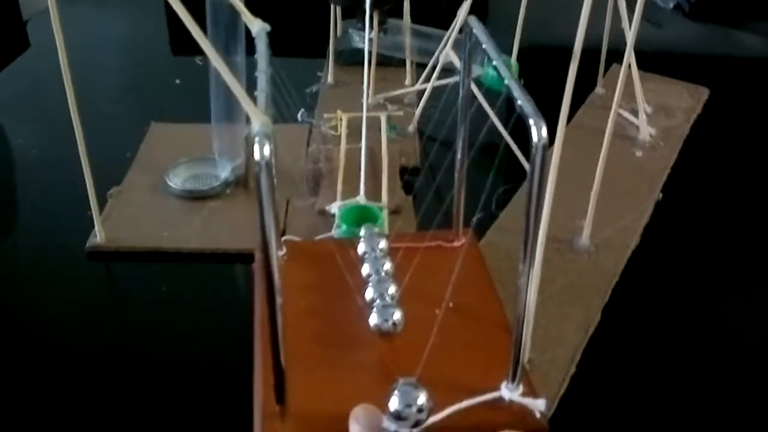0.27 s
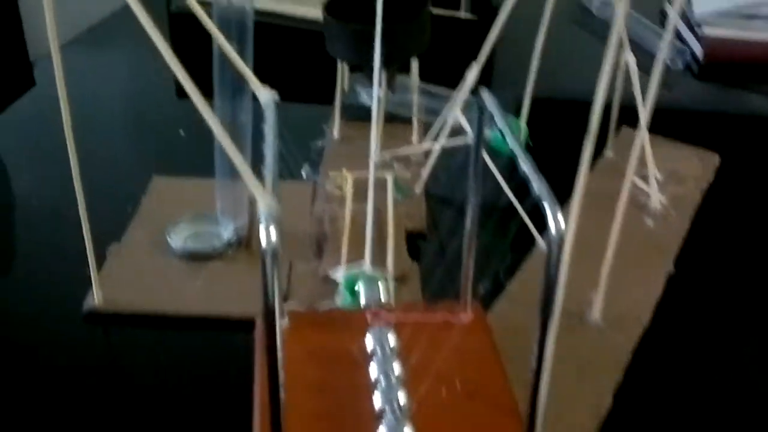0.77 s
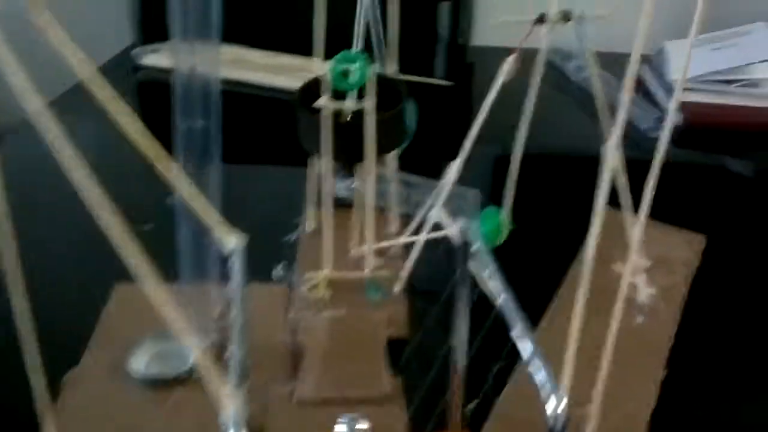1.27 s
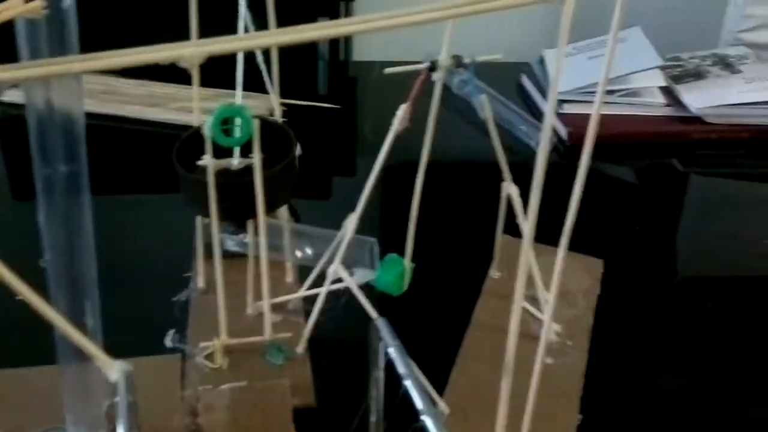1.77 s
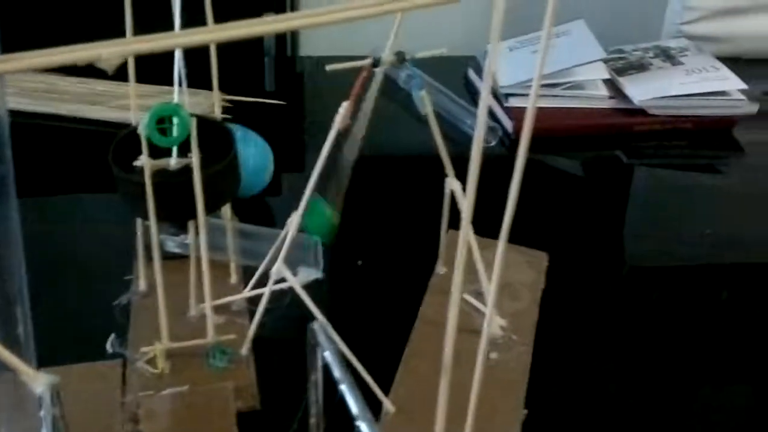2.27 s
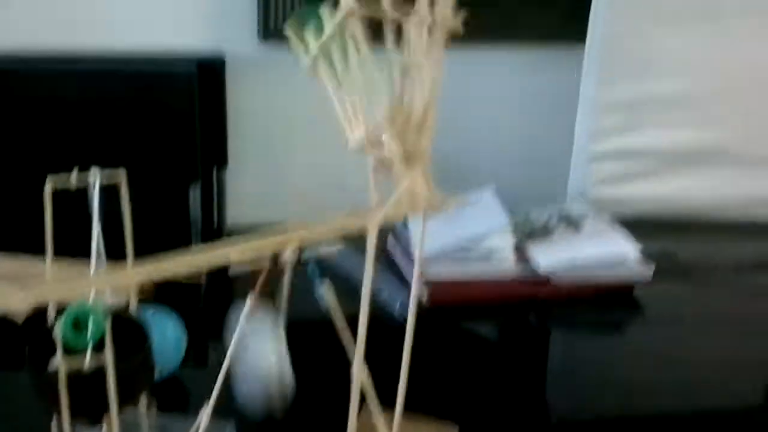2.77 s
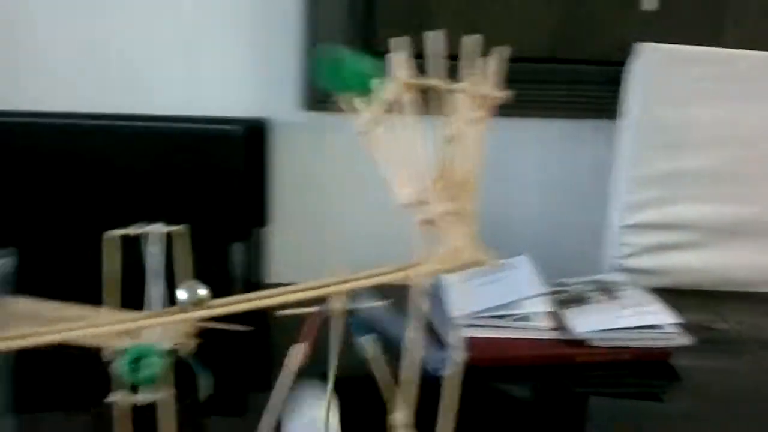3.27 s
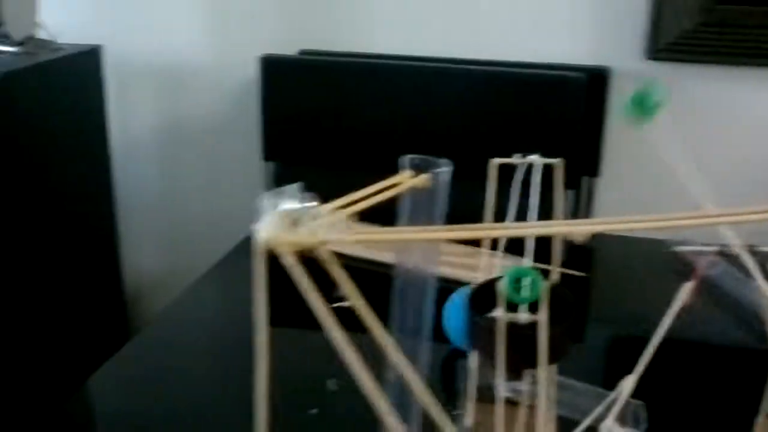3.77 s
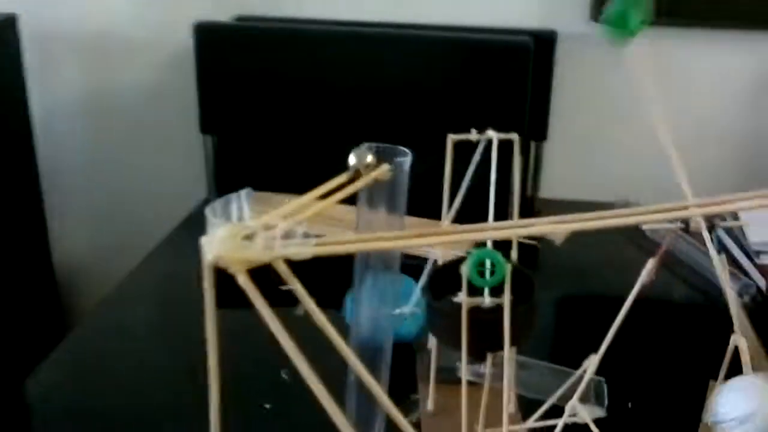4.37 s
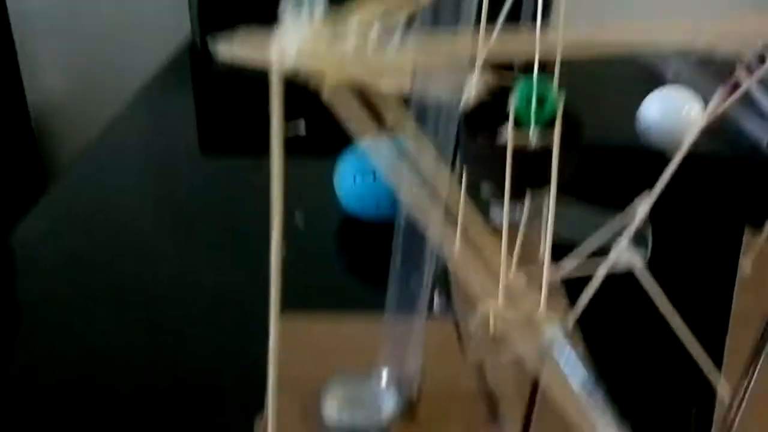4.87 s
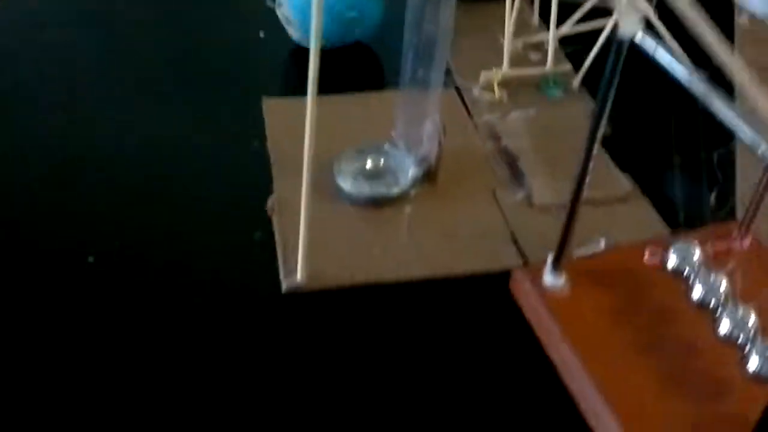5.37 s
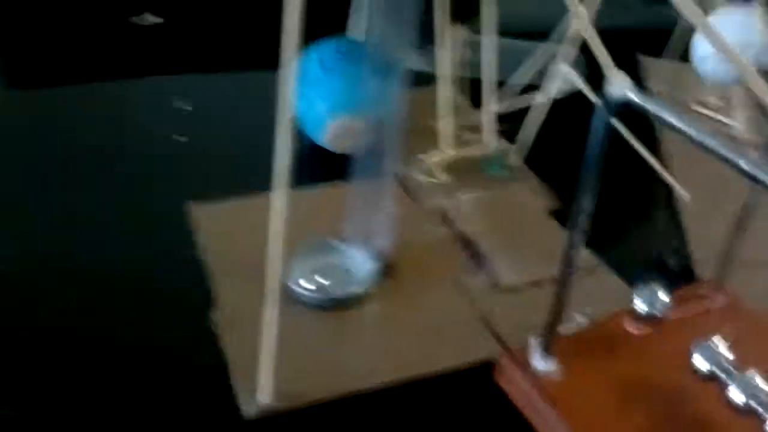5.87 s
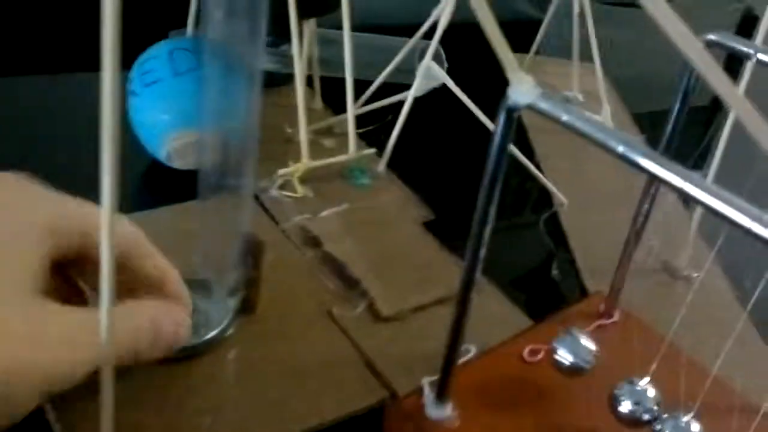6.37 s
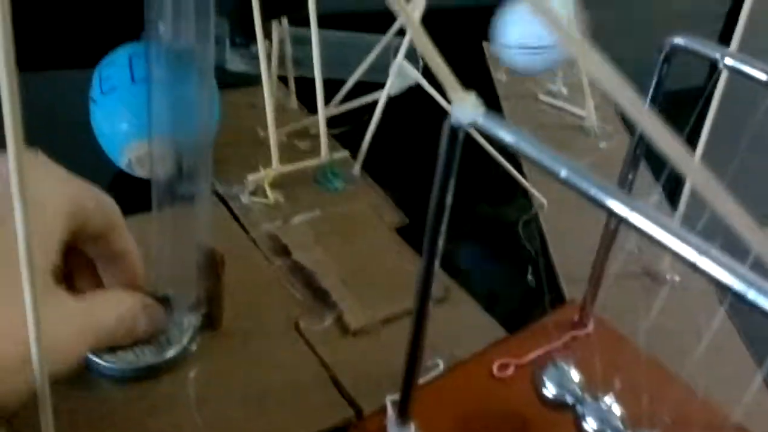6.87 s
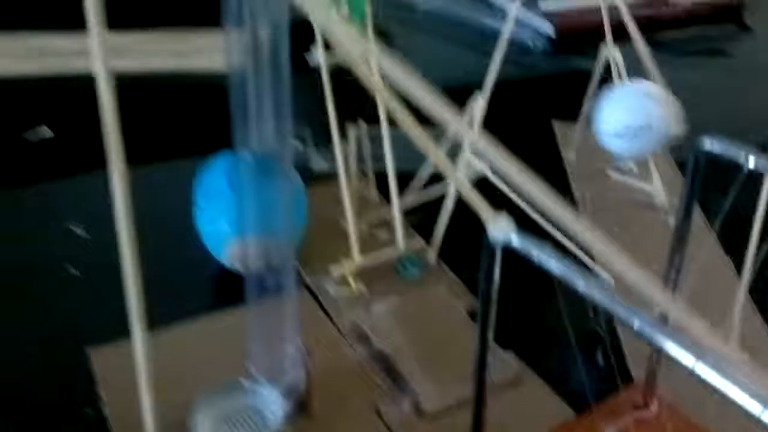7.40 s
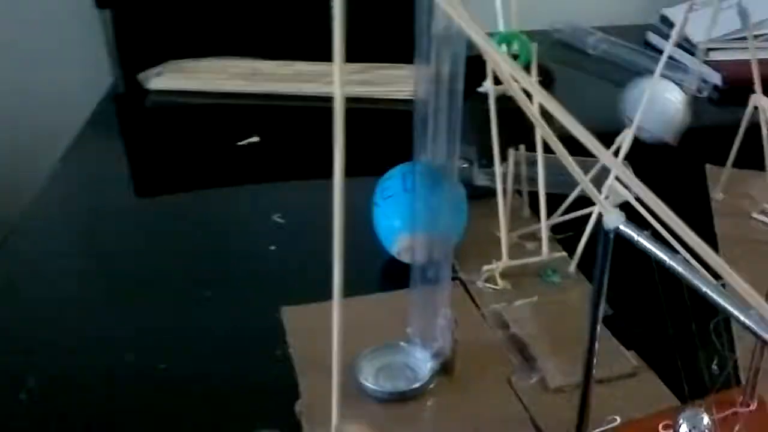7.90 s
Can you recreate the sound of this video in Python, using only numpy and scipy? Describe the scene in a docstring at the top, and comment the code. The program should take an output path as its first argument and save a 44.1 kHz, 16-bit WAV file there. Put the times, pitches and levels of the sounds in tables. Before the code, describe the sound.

Close handheld microphone in a small room with soft low drone. Steel balls begin clicking, a catch snaps, then a weight falls with loud sharp cracks and hollow booming thuds. Stick levers clack and knock, a ball rolls faintly down rails, hits a tube rim, rattles down and lands in a metal lid. Cradle clicks continue about three per second, with small finger clinks near the end.

```python
"""On a table in a small room a homemade chain-reaction machine runs, close to a hand-held camera.
A cradle of steel balls clicks three times a second and trips a catch; a weight drops, levers of sticks knock,
and a steel ball rolls down rails, falls through a plastic tube into a metal lid and is picked out by hand.
Blows excite ringing modes and a dense, quickly dying rattle; rolling and rubbing are streams of tiny random
contacts. Room noise with a low drone lies beneath, and dense reflections surround every blow."""
import sys
import numpy as np
from scipy import signal
from scipy.fft import rfft, irfft
from scipy.io import wavfile
from scipy.ndimage import uniform_filter1d

SR = 44100
rng = np.random.default_rng(int(sys.argv[2]) if len(sys.argv) > 2 else 0)


def digitize_waveform(pressure):
    """Quantize a signal to 16-bit integers and store it at the path in sys.argv[1].

    Rows of a 2-D input are taken as channels; values are limited to [-1, 1].
    """
    field = np.atleast_2d(pressure).T
    bounded = np.clip(field, -1, 1)
    quanta = np.round(bounded * 32767).astype(np.int16)
    wavfile.write(sys.argv[1], SR, quanta)


N = 358929
SIZE = 32768  # samples in the response of one blow
HZ = np.fft.rfftfreq(SIZE, 1 / SR)
T = np.arange(SIZE) / SR
TIME = np.arange(N) / SR


def amp(db):
    """Decibels to gain."""
    return 10 ** (np.asarray(db) / 20)


def read(points, hz):
    """A table joined by straight lines on a log-frequency axis."""
    f, value = np.transpose(points)
    return np.interp(np.log(hz + 1), np.log(f + 1), value)


def evened(x):
    """Scaled to rms 1."""
    return x / np.sqrt(np.mean(abs(x) ** 2) + 1e-20)


def panned(pan_db):
    """Left and right gains; a positive value makes the left louder by that much."""
    return amp([[pan_db / 2], [-pan_db / 2]])


def add(mix, s, sound):
    """Adds a stereo sound at time s."""
    part = mix[:, max(round(s * SR), 0):][:, :sound.shape[1]]
    part += sound[:, :part.shape[1]]


def causal(db):
    """Complex log response of the causal (minimum-phase) filter with this dB curve."""
    cepstrum = irfft(db * np.log(10) / 20)
    cepstrum[1:SIZE // 2] *= 2
    cepstrum[SIZE // 2 + 1:] = 0
    return rfft(cepstrum)


def body(colour, modes):
    """Response of an object: a broad colour with ringing modes added to it."""
    rings = 0
    for hz, db, t60 in modes:
        rings = rings + amp(db) / (1 + 2j * np.pi * (HZ - hz) * t60 / np.log(1000))
    return np.exp(causal(read(colour, HZ))) * (1 + rings)


def diffuse(z, hz):
    """Two unrelated spectra become a microphone pair: alike in the bass, nearly unrelated in the treble."""
    # left-right likeness of diffuse sound [f/Hz, correlation 0-1]
    likeness = [(25, 0.025), (70, 1), (250, 0.93), (500, 0.88), (1000, 0.62), (2000, 0), (16000, 0.097)]
    same = read(likeness, hz)
    mid = np.sqrt((1 + same) / 2) * z[0]
    side = np.sqrt((1 - same) / 2) * z[1]
    return np.array([mid + side, mid - side])


def room(build_s=0.0037, early_db=2, early_s=0.012):
    """One random response of the room: dense reflections, each band dying at its own speed."""
    # reverberation time by band [f/Hz, t60/s]
    decay = [(80, 0.55), (250, 0.39), (1000, 0.38), (2500, 0.34), (5000, 0.29), (9000, 0.24), (16000, 0.17)]
    # spectral balance of the reflections [f/Hz, level/dB]
    balance = [(60, 0.5), (250, -2.5), (1000, -2.5), (3000, -6), (7000, -6.5), (12000, -5), (16000, -13.5)]
    taps = rng.standard_normal((2, SIZE)) * (rng.random((2, SIZE)) < .15)
    hz, t, z = signal.stft(taps, SR, nperseg=256)
    dying = amp(-60 * t / read(decay, hz)[:, None])
    tail = signal.istft(z * dying, SR, nperseg=256)[1][:, :SIZE]
    tail *= 1 - np.exp(-(T / build_s) ** 2)  # the reflections build up
    tail *= amp(early_db * np.exp(-T / early_s))  # the early ones are stronger
    return evened(diffuse(rfft(tail), HZ)) * amp(read(balance, HZ))


def placed(rows, pan_db, room_db, tilt_db=0):
    """Blows on one object share its place and tilt: rows of (s, level, brightness, left-right, room)."""
    return [(s, db, tilt_db + sum(bright), pan_db, room_db) for s, db, *bright in rows]


def blows(rows, thing, rooms, dense_hz=500, apart=0.9, smear_s=.0008, bounce=0.18, left_lead_s=.00008):
    """Each blow is a sharp push and a quickly dying rattle of dense modes, heard through object and room."""
    colour, modes, rattle_s, share = thing
    response = body(colour, modes)
    # bending waves carry the treble faster: the delay is smear_s at 1 kHz
    response = response * np.exp(-4j * np.pi * smear_s * np.sqrt(HZ * 1000))
    slope = causal(np.log2(np.clip(HZ, 150, 12000) / 1000))  # one dB per octave, pivoting at 1 kHz
    share = share * HZ ** 2 / (HZ ** 2 + dense_hz ** 2)  # modes are sparse in the bass
    lag = np.exp(-2j * np.pi * HZ * np.array([[0], [left_lead_s]]))
    dying = np.exp(-np.log(1000) * T[:SIZE // 16] / rattle_s)
    fade = np.minimum(2 * (1 - T / T[-1]), 1) ** 2
    out = np.zeros((2, N))
    for k, (s, db, bright, pan_db, room_db) in enumerate(rows):
        common, left, right = rng.standard_normal((3, len(dying))) * dying
        rattle = evened(rfft(common + apart * np.array([left, right]), SIZE))
        hit = np.sqrt(1 - share) + np.sqrt(share) * rattle
        hit = hit * response * np.exp(bright * slope)
        # the table top throws the treble back
        hit *= 1 + bounce * share * np.exp(-2j * np.pi * HZ * rng.uniform(0.00059, .0015))
        hit = evened(hit) * np.sqrt(.002 * SR)  # unit level: energy packed into 2 ms has rms 1
        direct = evened(panned(pan_db)) * lag
        reflected = amp(room_db) * rooms[k % len(rooms)]
        add(out, s, amp(db) * fade * irfft(hit * (direct + reflected)))
    return out


def coloured(drive, thing):
    """A stereo stream played through an object, at rms 1."""
    pair = irfft(diffuse(rfft(drive), np.fft.rfftfreq(N, 1 / SR)), N)
    return evened(signal.oaconvolve(pair, irfft(body(*thing))[None], axes=1)[:, :N])


def friction(gain, thing, grains_per_s, spread_db, lumps_db, pan_db):
    """Tiny random contacts of rolling or sliding ring the object; uneven surfaces bunch them into lumps."""
    sizes = amp(spread_db * np.minimum(rng.exponential(1, (2, N)), 4)) * rng.standard_normal((2, N))
    grains = sizes * (rng.random((2, N)) < grains_per_s / SR)
    lumps = rng.standard_normal(N)
    for size in (2200, 900):
        lumps = uniform_filter1d(lumps, size=size)
    return gain * coloured(grains * amp(lumps_db * evened(lumps)), thing) * panned(pan_db)


def strokes(rows, edge_db=10):
    """Gain of short rubs: each swells to its peak and fades again, edge_db down at the ends of its length."""
    return sum(amp(db - edge_db * 2 * abs(TIME - s) / length) for s, db, length in rows)


def air():
    """Soft room noise: random noise through a broad colour, with resonances for a low drone."""
    # colour of the noise [f/Hz, relative level/dB]
    noise_colour = [(20, -9.5), (58, 2), (100, -12), (170, -8.5), (280, -5.5), (400, -13.5), (800, -14.5),
                    (1300, -14.5), (2000, -20.5), (4000, -24.5), (6300, -30), (10000, -32.5),
                    (16000, -43.5)]
    # resonances of the drone [f/Hz, level against the colour/dB, t60/s]
    drone = [(53.7, 4.5, 0.89), (184, -1, 0.56), (237.8, -8.5, 0.18), (288.6, 8, 0.25)]
    # loudness over time [t/s, level/dB]
    loudness = [(0, -57.5), (.6, -54.5), (5.6, -55), (8.14, -57)]
    gain = amp(np.interp(TIME, *np.transpose(loudness)))
    return gain * coloured(rng.standard_normal((2, N)), (noise_colour, drone))


def handling():
    """The hand shifts on the camera: grains of friction sound through its body."""
    # shifts of the grip [peak t/s, peak level/dB, length/s]
    shifts = [(5.46, -58, 0.049), (5.545, -48.5, .08), (5.76, -54, 0.21), (5.93, -48.5, 0.11),
              (6.11, -54, 0.13)]
    # gripped body: colour [f/Hz, level/dB], modes [f/Hz, level against the colour/dB, t60/s]
    gripped = ([(30, 1.5), (100, -4.5), (300, 5.5), (550, -6), (900, -14.5), (2000, -26), (5000, -23.5),
               (16000, -47.5)], [(550, 0, 0.049)])
    return friction(strokes(shifts), gripped, grains_per_s=900, spread_db=2, lumps_db=2, pan_db=2)


def camera_bumps(rooms):
    """Fingers bump the camera body: dull blows, far to the left, with little room around them."""
    # bumps [t/s, level/dB, brightness/dB per octave]
    bumps = [(5.7835, -20.5, -2.5), (5.792, -28, 1.5), (5.8055, -17, 3)]
    # camera: colour [f/Hz, level/dB], modes [f/Hz, level against colour/dB, t60/s], rattle t60/s, share 0-1
    camera = ([(25, -4.5), (160, 0), (400, 2), (750, -5.5), (1200, -14), (3000, -18), (5000, -38.5),
              (16000, -72)], [(163.5, 2.6, 0.047)], 0.032, 0.8)
    return blows(placed(bumps, pan_db=12, room_db=-21.5), camera, rooms)


def table_booms(rooms):
    """Heavy blows set the table top booming in its low modes."""
    # booms [t/s, level/dB]
    booms = [(.592, -39), (.618, -37.5), (.795, -36.5), (.866, -41.5), (1.0155, -12.5), (1.028, -9.5),
             (1.055, -15), (1.178, -20.5), (1.246, -12), (1.283, -12), (1.812, -42), (2.675, -24.5),
             (2.880, -39), (3.675, -32.5), (3.790, -33.5), (4.757, -18.5)]
    # table top: colour [f/Hz, level/dB], modes [f/Hz, level against colour/dB, t60/s], rattle t60/s, share 0-1
    table = ([(25, -24.5), (55, -12.5), (85, -5.5), (125, -4), (170, 3.5), (290, 0), (400, -17.5),
             (800, -35), (4000, -71)], [(83, 14, 0.3), (158, 11.2, 0.16), (201, 1.2, 0.46),
             (251, 1.2, 0.52), (326, 3, 0.57)], 0.015, 0.94)
    return blows(placed(booms, pan_db=1.4, room_db=-4.5, tilt_db=2.66), table, rooms)


def creaking():
    """Sticks creak faintly as the first ball is let go: sparse, uneven grains excite strong resonances."""
    # creaks [peak t/s, peak level/dB, length/s]
    creaks = [(.39, -58.5, .03), (.435, -53, 0.064)]
    # creaking sticks: colour [f/Hz, level/dB], modes [f/Hz, level against the colour/dB, t60/s]
    sticks = ([(300, -29), (1500, -18.5), (2400, -5), (4000, -7), (8000, -21), (16000, -39.5)],
              [(2390, 38, .015), (3600, 4, .04)])
    return friction(strokes(creaks), sticks, grains_per_s=1500, spread_db=5, lumps_db=4.0, pan_db=-1.0)


def scraping():
    """Light rubs of the swinging weight, then of fingers in the lid, as dense grains in lumps."""
    # rubs [peak t/s, peak level/dB, length/s]
    rubs = [(1.61, -34.5, .05), (1.81, -44, 0.077), (1.92, -53, .13), (5.83, -48, .08), (6.385, -43, .08),
            (6.56, -51.5, .2), (6.74, -53, .05), (6.8, -40, .06)]
    # rubbed surface: colour [f/Hz, level/dB], modes [f/Hz, level against the colour/dB, t60/s]
    surface = ([(100, -17), (300, 4), (700, -4), (1400, -3.5), (2200, -2), (3500, -9.5), (5500, -15),
               (9000, -25), (16000, -41.5)], [(1898, 3.4, 0.07)])
    return friction(strokes(rubs), surface, grains_per_s=2600, spread_db=1.5, lumps_db=4.5, pan_db=-2.0)


def stand_taps(rooms):
    """Light taps ring the stand of the weight."""
    # taps [t/s, level/dB]
    taps = [(.559, -39.5), (.642, -37.5), (.672, -40.5), (1.6133, -19.5), (1.6192, -16), (1.636, -16),
            (1.845, -32), (2.233, -34.5), (2.249, -26.5)]
    # stand: colour [f/Hz, level/dB], modes [f/Hz, level against colour/dB, t60/s], rattle t60/s, share 0-1
    stand = ([(50, -49), (160, -7), (400, -7.5), (700, -10.5), (1150, -5.5), (1600, -1), (2200, -5),
             (3500, -2.5), (5500, -10.5), (8000, -19), (16000, -45)], [(1580, 3.3, 0.05), (1184, 1.5, .06)],
             0.027, 0.66)
    return blows(placed(taps, pan_db=-1.0, room_db=-0.15, tilt_db=0.5), stand, rooms)


def catch_release(rooms):
    """The catch lets go in two close clicks with ringing modes."""
    # clicks [t/s, level/dB]
    clicks = [(.792, -18), (.807, -19)]
    # catch: colour [f/Hz, level/dB], modes [f/Hz, level against colour/dB, t60/s], rattle t60/s, share 0-1
    catch = ([(100, -24.5), (700, -21.5), (1200, -13), (1600, -5), (2400, 0.5), (3400, -4), (4800, -3.5),
             (6500, -16), (10000, -33.5), (16000, -43)], [(860, 13.5, .12), (2450, 0.5, 0.045)], 0.0037, .7)
    return blows(placed(clicks, pan_db=-1.8, room_db=4.2), catch, rooms)


def frame_snaps(rooms):
    """The falling weight snaps against its frame, which rings."""
    # snaps [t/s, level/dB, brightness/dB per octave]
    snaps = [(.989, -26, 2), (1.0148, -4.5, 1.47), (1.020, -11, 0.8), (1.127, -17, 2), (1.137, -22, 3),
             (1.1773, -5.5, -0.2), (1.181, -8.5, 2.5), (1.235, -25, 1), (1.250, -23.5, -1.5),
             (1.283, -31, -2.5)]
    # frame: colour [f/Hz, level/dB], modes [f/Hz, level against colour/dB, t60/s], rattle t60/s, share 0-1
    frame = ([(80, -23.5), (250, -17), (500, -3), (1000, -1.5), (1600, -4), (2500, -10), (4500, -0.5),
             (6000, -8.5), (9000, -16.5), (12000, -32), (16000, -52)], [(828, 6.5, 0.21), (1150, 0.5, 0.12),
             (1268, 5.5, 0.053), (2500, 1.5, 0.012), (4300, -6.5, 0.058)], 0.016, 0.63)
    return blows(placed(snaps, pan_db=1.0, room_db=1.6), frame, rooms)


def weight_thuds(rooms, count=6):
    """The weight lands twice with hollow thuds and rocks from edge to edge, weaker each time."""
    # landings [t/s, level/dB, time between rocks/s, loss per rock/dB]
    landings = [(1.2455, -7, .0044, 3), (1.2823, -8, .0105, 3.5)]
    # weight: colour [f/Hz, level/dB], modes [f/Hz, level against colour/dB, t60/s], rattle t60/s, share 0-1
    weight = ([(60, -15), (150, -8.5), (280, 2), (420, 1), (650, 4), (900, -1), (1300, 3), (1700, -17.5),
              (2500, -17), (4500, -29.5), (8000, -60.5), (16000, -69)], [(273, 6, 0.4), (486, 8.5, 0.34),
              (589, 1.5, 0.25), (786, 2.5, 0.25), (1200, 0, 0.14), (1230, 2.5, 0.25), (1374, -0.5, 0.3)],
              .016, 0.39)
    rocks = [(s + k * gap_s, db - k * loss_db)
             for s, db, gap_s, loss_db in landings for k in range(count)]
    return blows(placed(rocks, pan_db=1.0, room_db=1.55), weight, rooms)


def lever_clacks(rooms):
    """Light levers clack together, with high ringing modes."""
    # clacks [t/s, level/dB, brightness/dB per octave]
    clacks = [(2.008, -33, -4.5), (2.0287, -16.5, -2.5), (2.0357, -17.5, 5), (2.0426, -25, 0.5),
              (2.228, -35.5, -5.5), (2.2485, -17, -0.5), (2.259, -24.5, -2)]
    # lever: colour [f/Hz, level/dB], modes [f/Hz, level against colour/dB, t60/s], rattle t60/s, share 0-1
    lever = ([(100, -33.5), (300, -14.5), (600, -16), (1000, -4), (1600, -1), (2400, -6.5), (4000, 8.5),
             (6000, 3), (9000, -4.5), (12000, -19.5), (16000, -40.5)], [(1560, 3.4, 0.073), (3740, 5, 0.07),
             (4270, 5, 0.07), (8390, 2, 0.031)], 0.024, 0.3)
    return blows(placed(clacks, pan_db=-3.5, room_db=1.6), lever, rooms)


def stick_knocks(rooms):
    """Knocks on the sticks, and at 2.853 s the ball landing on the rails, excite low and high modes."""
    # knocks and the landing [t/s, level/dB, brightness/dB per octave]
    knocks = [(2.657, -28, 3), (2.6675, -12.5, 2), (2.6705, -8, -0.5), (2.681, -13, 1),
              (2.853, -23.5, -3.5), (2.857, -24.5, -5), (2.886, -34, -2.5), (3.005, -42, -3),
              (3.3475, -26, 1), (3.360, -25, 1.5), (3.367, -25, -1.5), (3.432, -27, 0.5), (4.040, -34, 4.5),
              (4.054, -26.5, 1.5), (4.123, -33, 4)]
    # stick: colour [f/Hz, level/dB], modes [f/Hz, level against colour/dB, t60/s], rattle t60/s, share 0-1
    stick = ([(70, -18.5), (110, -8.5), (200, -7), (400, -3.5), (600, -3.5), (1000, -6), (1500, -0.5),
             (2300, 0.5), (3900, 2.5), (5200, -3.5), (7500, -18.5), (11000, -28.5), (16000, -40.5)],
             [(112, 5, 0.24), (225, 3.5, 0.15), (580, 9, 0.2), (628, 6, 0.14), (1674, 3, 0.11),
             (2330, 6.3, 0.073)], 0.02, 0.79)
    return blows(placed(knocks, pan_db=-5.5, room_db=-0.06), stick, rooms)


def rolling(growth=0.59, stop_s=.05):
    """The ball gathers speed evenly down two rails; loudness is a power of speed and dies at the bottom."""
    # runs down the rails [start t/s, length/s, level at the bottom/dB]
    descents = [(2.86, .86, -50), (3.93, 0.87, -62.5)]
    # rails: colour [f/Hz, level/dB], modes [f/Hz, level against the colour/dB, t60/s]
    rails = ([(60, -12), (170, -3.5), (330, 2), (600, -6), (1100, -7.5), (1600, -0.5), (2400, -15),
             (3200, -16.5), (7000, -30), (16000, -42)], [(1550, 3.2, 0.06), (2420, 24, .06)])
    gain = np.zeros(N)
    for s, length, db in descents:
        speed = np.clip((TIME - s) / length, 0, 1)
        stopping = np.exp(-np.maximum(TIME - s - length, 0) / stop_s)
        gain += amp(db) * speed ** growth * stopping
    return friction(gain, rails, grains_per_s=2000, spread_db=2, lumps_db=2.5, pan_db=-1)


def rail_jolts(rooms):
    """The ball bumps over the joints of the rails, and each bump rings them."""
    # jolts [t/s, level/dB]
    jolts = [(3.640, -37.5), (3.677, -33), (3.705, -36.5), (3.770, -34.5), (3.808, -30.5), (4.402, -34),
             (4.417, -34), (4.445, -42), (4.488, -40.5), (4.579, -30.5)]
    # joint: colour [f/Hz, level/dB], modes [f/Hz, level against colour/dB, t60/s], rattle t60/s, share 0-1
    joint = ([(70, -10.5), (180, 0.5), (330, 2), (600, -4), (1000, -9), (1500, -5), (2400, -17),
             (4000, -21), (7000, -26), (16000, -50.5)], [(196.5, 1.5, 0.16), (1600, -5, 0.043),
             (2422, -2, .04)], 0.017, 0.94)
    return blows(placed(jolts, pan_db=-1.5, room_db=1.4, tilt_db=1.0), joint, rooms)


def rim_strikes(rooms):
    """The ball strikes the rim of the tube, then the rim of the lid, ringing close modes near 2 kHz."""
    # strikes [t/s, level/dB]
    strikes = [(4.635, -41.5), (4.7415, -6), (4.745, -13.5), (5.017, -7.5), (5.030, -18.5)]
    # rim: colour [f/Hz, level/dB], modes [f/Hz, level against colour/dB, t60/s], rattle t60/s, share 0-1
    rim = ([(100, -22.5), (1200, -19.5), (1700, -6), (2050, 4), (2500, -2.5), (3200, -22.5), (7500, -13.5),
           (16000, -54.5)], [(1924, 9.1, .14), (2060, 4, .15), (2120, 2, .12), (2280, 1, .025)],
           0.0067, 0.46)
    return blows(placed(strikes, pan_db=-9.5, room_db=0.0), rim, rooms)


def tube_drop(rooms):
    """The ball drops into the plastic tube and knocks its modes."""
    # knocks [t/s, level/dB, brightness/dB per octave]
    knocks = [(4.743, -15.5, -1), (4.752, -12.5, -2.5), (4.7625, -9, 4.5), (4.765, -10.5, -1),
              (4.780, -20.5, -2.5)]
    # tube: colour [f/Hz, level/dB], modes [f/Hz, level against colour/dB, t60/s], rattle t60/s, share 0-1
    tube = ([(80, -18.5), (200, -6), (500, -9.5), (1000, -4), (1500, -3), (2000, -5), (2600, -2.5),
            (3500, -7.5), (5000, -5), (7500, -21.5), (11000, -41), (16000, -55.5)], [(302, 1.4, .15),
            (424, 6.4, 0.09), (1945, 4.6, 0.11), (2190, 5.5, 0.086)], 0.048, 0.27)
    return blows(placed(knocks, pan_db=0.0, room_db=-0.8), tube, rooms)


def lid_landing(rooms):
    """The ball lands in the metal lid and rattles, ringing its modes."""
    # hits [t/s, level/dB, brightness before the shared tilt/dB per octave]
    hits = [(5.018, -12, 0), (5.028, -20, 1), (5.0383, -10.5, 0.5), (5.064, -20, -1.5), (5.1125, -17, 1),
            (5.116, -17, -3), (5.128, -23.5, -1.5)]
    # lid: colour [f/Hz, level/dB], modes [f/Hz, level against colour/dB, t60/s], rattle t60/s, share 0-1
    lid = ([(80, -44.5), (220, -12.5), (500, -17.5), (1000, -7.5), (1500, -5), (2000, -0.5), (2700, -1.5),
           (3500, -5), (4700, -3), (7000, -17.5), (11000, -28.5), (16000, -47)], [(205, 7, .2),
           (1420, 13, 0.079), (1884, 1, .25), (2022, -0.5, 0.25), (2665, -0.5, 0.1)], 0.0043, 0.97)
    return blows(placed(hits, pan_db=-1.5, room_db=0.9, tilt_db=0.77), lid, rooms)


def lid_clinks(rooms):
    """Fingers pick the ball out and it clinks against the damped lid, whose modes ring only briefly."""
    # clinks [t/s, level/dB]
    clinks = [(6.364, -43.5), (6.385, -37), (6.4293, -18.5), (6.433, -23.5), (6.450, -30), (6.459, -26.5),
              (6.767, -27), (6.778, -32.5), (6.789, -31.5)]
    # damped lid: colour [f/Hz, level/dB], modes [f/Hz, level against colour/dB, t60/s], rattle t60/s, share 0-1
    damped = ([(100, -23), (300, -15), (600, -18.5), (1000, -5.5), (1500, 1), (2700, -3), (4300, -4.5),
              (6000, -12), (9000, -23.5), (16000, -43.5)], [(1798, 0.98, 0.12), (2635, 3.7, 0.03),
              (4356, 1.4, 0.023)], 0.013, 1)
    return blows(placed(clinks, pan_db=-6.5, room_db=1.2, tilt_db=0.3), damped, rooms)


def cradle(rooms, room_db=-1, dull_dry=.6, count=3):
    """Each swing of the steel balls ends in up to three contacts; the dull ones carry less into the room."""
    # swings or light touches [t/s, level before the contact rise/dB, brightness/dB per octave, clatter/s]
    swings = [(0.5578, -25.5, 5, 0), (0.5873, -25, -1, 0.0029), (.640, -37.5, -8, 0.0011),
              (.673, -36, 6, 0), (0.8656, -17, -3, 0.0022), (1.415, -43.5, -1.5, 0),
              (1.5037, -28.5, 2, 0.0091), (1.8238, -26.5, 1.5, 0.0098), (2.1455, -23.5, -0.5, 0.0039),
              (2.467, -27.5, 1.5, 0.0031), (2.788, -20.5, -5, 0.0028), (3.1076, -29, 2.5, .003),
              (3.4272, -24.5, -1.5, 0.0029), (3.7458, -26.5, 1, 0.0023), (4.015, -45.5, -2, 0.00048),
              (4.0661, -19, -2.5, 0.0022), (4.262, -46.5, -1, 0), (4.3811, -31, 3, 0.0073),
              (4.7008, -30.5, 0.5, 0.007), (5.3381, -30.5, 2, .0068), (5.6562, -30.5, 2, 0.0041),
              (5.9759, -30, 2, 0.0012), (6.2923, -30.5, -1, 0.0033), (6.609, -28, -2.5, 0.0038),
              (6.9218, -31, 0.5, 0.0047), (7.2416, -32.5, -2, 0.004), (7.5585, -34.5, -1, 0.0031),
              (7.8753, -35.5, -1.5, 0.0044)]
    # where the cradle lies as the camera moves [t/s, left over right/dB]
    pan = [(.9, 5), (1.5, -8), (4.4, -8), (6.6, -14.5), (7.9, -10.5)]
    # steel ball: colour [f/Hz, level/dB], modes [f/Hz, level against colour/dB, t60/s], rattle t60/s, share 0-1
    steel = ([(100, -25), (600, -20), (1500, -18.5), (2500, -7.5), (3800, -2), (5500, 4), (7500, 0.5),
             (10000, -3), (13000, -11), (16000, -27)], [(4160, 0.5, 0.003), (6660, -17.5, 0.0066)],
             0.013, 1)
    contact_gap_s = .0022  # the balls hang slightly apart; a clatter this long has room for a second contact
    rise_db = 2  # the last of several contacts is this much stronger than the first
    crowding = 0.48  # power under 1: contacts follow each other ever faster
    contacts = []
    for s, db, bright, clatter_s in swings:
        pan_db = np.interp(s, *np.transpose(pan))
        for part in np.linspace(0, 1, min(count, 1 + int(clatter_s / contact_gap_s))):
            t = s + clatter_s * part ** crowding
            contacts.append((t, db + rise_db * (part - .5), bright, pan_db, room_db + dull_dry * bright))
    return blows(contacts, steel, rooms)


def scene():
    """The quiet room, the rolling and rubbing, and all the blows, taking five random room responses in turn."""
    rooms = [room() for _ in range(5)]
    struck = [camera_bumps, table_booms, stand_taps, catch_release, frame_snaps, weight_thuds, lever_clacks,
              stick_knocks, rail_jolts, rim_strikes, tube_drop, lid_landing, lid_clinks, cradle]
    rubbed = handling() + creaking() + scraping() + rolling()
    return air() + rubbed + sum(source(rooms) for source in struck)


def suppress(x, depth_db=6, margin_db=12, from_hz=2000):
    """Noise suppression: treble not well above its own floor is turned down, which shortens faint tails."""
    hz, _, z = signal.stft(x, SR, nperseg=512)
    power = (abs(z) ** 2).mean(0)
    power = uniform_filter1d(uniform_filter1d(power, size=7, axis=0), size=2, axis=1)
    floor = np.percentile(power, 15, axis=1)[:, None]
    threshold = floor * amp(margin_db) ** 2 + 1e-20
    treble = (hz ** 2 / (hz ** 2 + from_hz ** 2))[:, None]
    cut_db = depth_db * treble / (1 + abs(power) / threshold)
    return signal.istft(z * amp(-cut_db), SR, nperseg=512)[1][:, :N]


def record(dry):
    """Hiss is suppressed and the loudest peaks overload; then the band limit."""
    quiet = suppress(dry)
    clipped = quiet / (1 + quiet ** 8) ** (1 / 8)
    lowpass = signal.firwin(255, 16400, window=("kaiser", 8), fs=SR)  # edge in Hz
    return signal.oaconvolve(clipped, lowpass[None], "same")


dry = scene()
out = record(dry)
digitize_waveform(out)
```